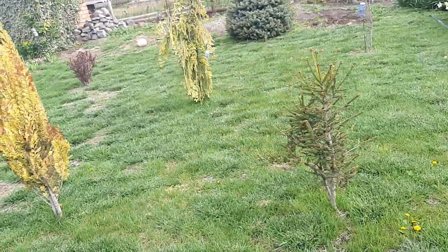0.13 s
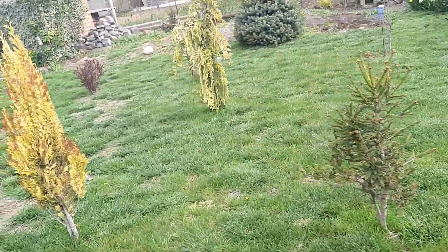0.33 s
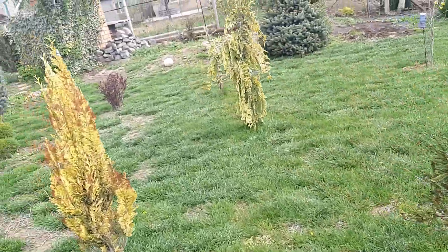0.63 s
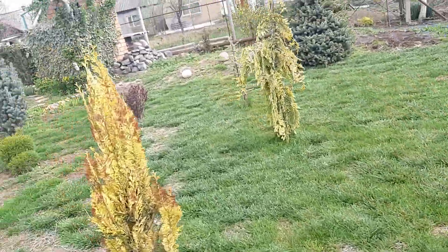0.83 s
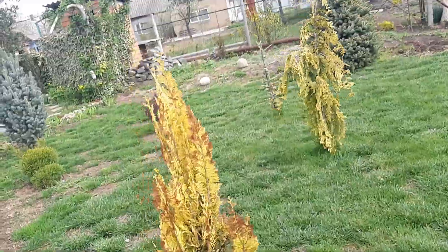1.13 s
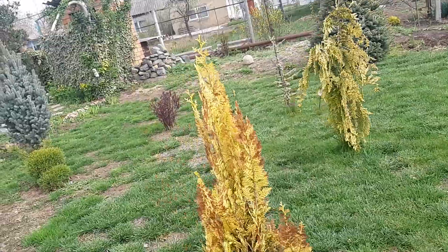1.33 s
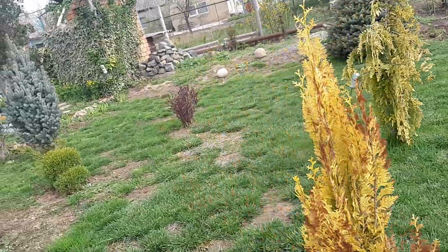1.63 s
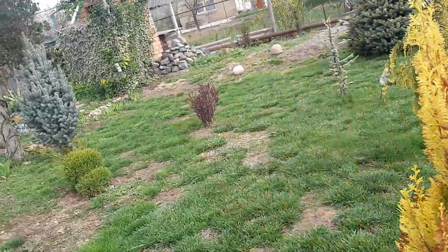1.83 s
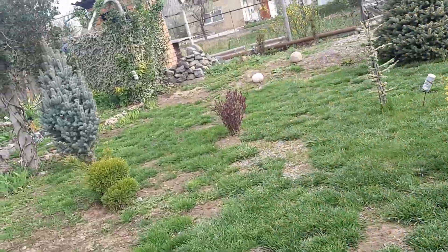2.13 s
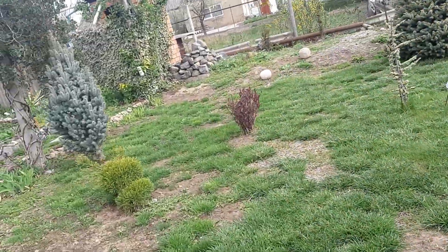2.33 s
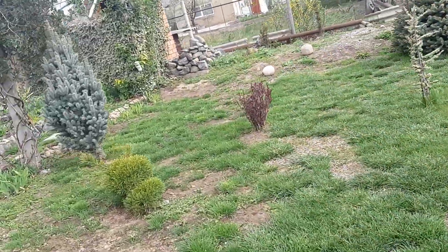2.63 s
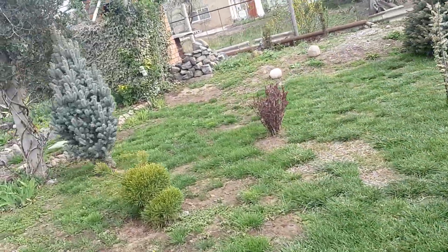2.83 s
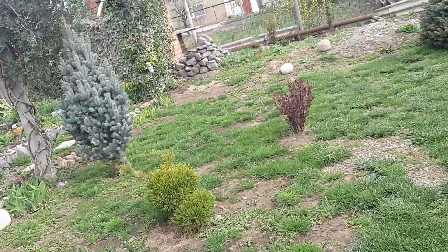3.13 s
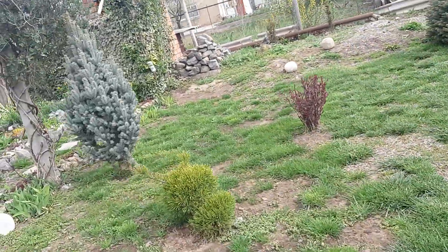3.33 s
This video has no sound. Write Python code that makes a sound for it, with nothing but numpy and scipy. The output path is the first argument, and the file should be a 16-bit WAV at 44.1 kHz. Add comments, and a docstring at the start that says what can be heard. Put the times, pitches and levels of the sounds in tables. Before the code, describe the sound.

Slow, soft footsteps cross a garden lawn, close by, at about 0.3, 0.9, 1.5, 2.1, 2.7 and 3.3 seconds. The strides mix a zipping trouser swish, hissing grass and a dull crunch, with a few tiny stalk snaps. From about 0.8 seconds, light gusts thump and rumble on the microphone, mostly on the right, strongest near 3.5 seconds. The garden behind is very quiet.

```python
"""Slow steps on a lawn

Someone walks six slow steps over a garden lawn, holding the microphone. In each stride the
trouser legs brush with a zipping swish, and the shoe sweeps the grass and presses the turf flat.
Light gusts buffet the microphone's openings, mostly the right one, over a very quiet garden."""
import sys
import numpy as np
from scipy import signal
from scipy.fft import rfft, irfft
from scipy.io import wavfile
from scipy.ndimage import uniform_filter1d

SR = 44100
rng = np.random.default_rng(int(sys.argv[2]) if len(sys.argv) > 2 else 0)


def put_to_file(sound):
    """Save the sound as 16-bit audio at rate SR, in the file named by the first command-line argument."""
    columns = np.atleast_2d(sound).T  # one column per channel
    safe = np.clip(columns, -1, 1)
    whole_steps = np.round(safe * 32767)
    wavfile.write(sys.argv[1], SR, whole_steps.astype(np.int16))


N = 154350
T = np.arange(N) / SR
HZ = np.maximum(np.fft.rfftfreq(N, 1 / SR), 1)


def from_db(db):
    """Turn decibels into a gain."""
    return 10 ** (np.asarray(db) / 20)


def unit_power(x):
    """Scale a signal to an average power of 1."""
    return x / np.sqrt(np.mean(x ** 2) + 1e-20)


def stereo(pan_db):
    """Left and right gains; pan_db is how much louder the left is."""
    gains = from_db(np.atleast_1d(pan_db) * np.array([[.5], [-.5]]))
    return gains / np.sqrt(np.mean(gains ** 2, axis=0))


def drift(rate_hz):
    """A smooth random wobble, about 1 in size."""
    return unit_power(irfft(rfft(rng.standard_normal(N)) / (1 + (HZ / rate_hz) ** 2), N))


def envelope(full_s, rise_s, hold_s, fade_s):
    """Swell to full level at full_s, hold, then die away."""
    return np.exp(-(np.minimum(T - full_s, 0) / rise_s) ** 2 - np.maximum(T - full_s - hold_s, 0) / fade_s)


def contacts(per_s, spread_db):
    """Tiny random clicks of unequal size."""
    clicks = (rng.random(N) < per_s / SR) * rng.choice([-1, 1], N)
    return unit_power(clicks * from_db(spread_db * np.minimum(rng.exponential(1, N), 4)))


def shape_tone(noises, tone, left_delay_s=.079e-3):
    """Shape three noises (shared, left, right) into stereo; likeness is the shared part, 0 to 1."""
    hz, *columns = np.transpose(tone)
    db, pan, likeness = [np.interp(np.log(HZ), np.log(hz), c) for c in columns]
    spectra = rfft(np.array(noises))
    pair = np.sqrt(likeness) * spectra[0] + np.sqrt(1 - likeness) * spectra[1:]
    pair *= from_db(db) * stereo(pan)
    pair[0] *= np.exp(-2j * np.pi * HZ * left_delay_s)
    return unit_power(irfft(pair, N))


def friction(strokes, tone, per_s, spread_db, flutter_db, flutter_hz):
    """Rubbing is many tiny contacts; it flutters as they catch and let go."""
    level = np.sqrt(sum((from_db(db) * envelope(s, *shape)) ** 2 for s, db, *shape in strokes))
    texture = shape_tone([contacts(per_s, spread_db) for _ in range(3)], tone)
    flutter = unit_power(from_db(flutter_db * drift(flutter_hz)))
    return level * texture * flutter


# Tone of the background: frequency_hz, gain_db, pan_db, likeness
GARDEN_TONE = [(19, -21, 0, 0.46), (41.7, -5.5, -7.5, 0.4), (88, 1, 1, 0.9), (130, -14, 0, 0.44),
               (270, -27, 0.5, 0.9), (447, -34, 0, 1), (970, -38.5, -0.5, 0.17), (2000, -38.5, -4.5, 0.067),
               (3530, -41, -3.5, 0.24), (4700, -42.5, 2.5, 0.035), (15500, -45, 0, 0.13)]

def garden():
    """The still garden: a steady low rumble with a faint hiss."""
    return from_db(-55.5) * shape_tone(rng.standard_normal((3, N)), GARDEN_TONE)


# Each rub: full_s, level_db, rise_s, hold_s, fade_s
CLOTH_RUBS = [(.02, -69, 0.029, 0.011, 0.012), (.178, -50, 0.01, 0.062, 0.038),
              (.33, -54.5, 0.12, 0.017, 0.053), (.63, -70, 0.027, 0.059, 0.024),
              (.79, -58.5, 0.039, .1, 0.14), (.93, -57.5, 0.06, 0.023, 0.028),
              (1.41, -58, 0.033, 0.1, 0.035), (1.57, -62, 0.029, 0.017, 0.06),
              (1.98, -62.5, 0.016, 0.052, 0.057), (2.14, -61.5, 0.057, 0.051, 0.037),
              (2.585, -60.5, 0.015, 0.095, 0.051), (2.75, -56.5, 0.012, 0.018, 0.022),
              (3.158, -57.5, 0.011, .055, 0.05), (3.33, -62.5, .04, 0.066, 0.036)]
# Its tone: frequency_hz, gain_db, pan_db, likeness
CLOTH_TONE = [(150, -30, -7, 0.78), (448, -15, 47, 0.23), (750, -12.5, -5, .8), (1020, -11, -6, 0.67),
              (1390, -1, -11, 0.27), (2020, 5, -14, 0.44), (2450, 1, -15, 1), (3370, 1.5, -15, 0.23),
              (3890, -6, -22, 0.34), (4980, -11, 29, 0.1), (15100, -34, 0, 0.066)]

def cloth_rub():
    """Cloth and shoe rub with a broad, scuffing noise."""
    return friction(CLOTH_RUBS, CLOTH_TONE, per_s=7000, spread_db=4.5, flutter_db=1.52, flutter_hz=44)


# The legs pass each other: start_s, length_s, level_db, fade_db, pitch_hz, rasp_over_whistle_db
LEG_PASSES = [(.162, 0.065, -41.5, 7, 4760, 2.5), (.743, 0.14, -51.5, 0.5, 4236, -9.5),
              (1.377, 0.12, -51, 4, 4644, 1), (2.591, 0.13, -51, 2.5, 4220, -5),
              (3.234, .125, -46.5, 7, 4333, -9)]

def trouser_swish():
    """Patches of ribbed cloth whistle, sinking as the leg slows; many smaller ones blur into a rasp."""
    end_hz, left_delay_s, left_own_share = 3444, .094e-3, .86
    out = np.zeros((2, N))
    for start, length, db, fade_db, hz, rasp_db in LEG_PASSES:
        age = np.maximum(T - start, 0)
        progress = np.minimum(age / length, 1)
        catch = 1 - .18 * np.exp(-age / .003)  # the pitch leaps up as the cloth catches
        glide = (hz + (end_hz - hz) * progress) * catch
        joined = np.clip(age / .02254 - 1, 0, 1)  # three patches swell in after the first
        whistle = np.zeros((2, N))
        for patch in range(4):
            wander = .12 * np.tanh(drift(31)) * (1 + joined) / 2
            pitch = glide * (1 + wander + .0297 * drift(857))
            phase = 2 * np.pi * np.cumsum(pitch) / SR
            patch_db = -1.5 - 9 * (1 - joined) if patch else 0
            gain = from_db(patch_db + .94 * drift(87))
            left_phase = phase - 2 * np.pi * pitch * left_delay_s + .63 * drift(38)
            whistle += gain * np.sin([left_phase, phase])
        whistle /= np.std(whistle[:, int(start * SR):])
        band = signal.butter(6, [2778, 1.057 * hz], "band", fs=SR, output="sos")
        right, own = signal.sosfilt(band, rng.standard_normal((2, N)))
        delayed = np.interp(T - left_delay_s, T, right)
        left = np.sqrt(1 - left_own_share) * delayed + np.sqrt(left_own_share) * own
        rasp = unit_power(np.array([left, right]) * from_db(2 * drift(180))) * np.minimum(age / .045, 1)
        swish = (whistle + from_db(rasp_db) * rasp) / np.hypot(1, from_db(rasp_db))
        out += swish * from_db(db - fade_db * progress) * envelope(start + .005, .005, length, .033)
    return out


# Each press of the sole: full_s, level_db, rise_s, hold_s, fade_s
TURF_PRESSES = [(.178, -56.5, .014, .05, 0.033), (.35, -55, 0.054, 0.029, 0.025),
                (.92, -53, 0.023, 0.051, 0.041), (1.225, -66, 0.013, 0.0082, 0.023),
                (1.39, -75, .015, 0.021, 0.03), (1.555, -64.5, 0.057, 0.067, 0.018),
                (2.148, -52.5, 0.023, 0.012, 0.028), (2.25, -69.5, 0.089, 0.021, 0.069),
                (2.58, -84, 0.0089, 0.0086, 0.015), (2.745, -56.5, 0.024, .02, 0.019),
                (3.126, -61.5, 0.015, 0.024, 0.081), (3.325, -57.5, 0.017, 0.034, 0.042)]
# Its tone: frequency_hz, gain_db, pan_db, likeness
TURF_TONE = [(200, -24, -31, 0.48), (425, -8.5, -10, .8), (600, -4, 2.5, 1), (774, 1.5, -4.5, 0.9),
             (946, -1, -3.5, 0.73), (1090, -5, -3, 0.52), (1570, -5, -12, 0.27), (2540, -16.5, -17, 0.61),
             (3970, -14.5, 1, 0.22), (5930, -23.5, 4, 0.3), (15000, -21.5, 0, 0.14)]

def turf_press():
    """The sole flattens the turf with a dull crunch."""
    return friction(TURF_PRESSES, TURF_TONE, per_s=3000, spread_db=0, flutter_db=1.55, flutter_hz=45)


# Each sweep through the grass: full_s, level_db, rise_s, hold_s, fade_s
GRASS_SWEEPS = [(.225, -53, 0.052, 0.055, 0.083), (.35, -58, 0.049, 0.042, 0.04),
                (.8, -61, 0.057, 0.12, 0.068), (.935, -53, 0.035, 0.026, 0.038),
                (1.03, -65, .05, 0.15, 0.062), (1.41, -65.5, 0.041, .07, .04),
                (1.52, -56.5, .025, 0.057, 0.09), (2.0, -69, 0.015, 0.074, 0.05),
                (2.145, -57.5, 0.046, 0.03, 0.059), (2.61, -62.5, 0.036, 0.1, .04),
                (2.755, -55.5, .02, 0.017, 0.035), (3.19, -58, 0.038, 0.059, 0.057),
                (3.36, -58.5, 0.038, .025, 0.066)]
# Its tone: frequency_hz, gain_db, pan_db, likeness
GRASS_TONE = [(350, -24, 2, .7), (900, -34, -10, 0.26), (3680, 7.5, -13.5, 0.28), (5100, -5, 4, .4),
              (7000, 1.5, 3, 0.31), (7220, -4, 1, 0.19), (9350, 4, -8, 0.87), (11030, -5.5, -0.5, 0.11),
              (14900, -5.5, 11, .1), (16600, 2.5, 8, .2)]

def grass_sweep():
    """Blades of grass slide over the shoe with a bright hiss."""
    return friction(GRASS_SWEEPS, GRASS_TONE, per_s=18000, spread_db=7.5, flutter_db=.4, flutter_hz=20)


# Small swirls of air, and last a loud sharp click just before the end: middle_s, peak_db, rate_hz, pan_db
AIR_SWIRLS = [(0.28, -35.5, 88, 26), (.822, -27.5, 89, -11), (0.869, -33, 269, -35), (.893, -23, 139, -36),
              (1.009, -24.5, 93, -37), (1.055, -30, 93, -34), (1.305, -32.5, 169, -32),
              (1.363, -29.5, 144, -33), (1.574, -25, 132, 20), (1.797, -26.5, 176, -30),
              (1.949, -22, 97, -36), (2.126, -24.5, 122, -31), (2.222, -23.5, 106, -36),
              (2.228, -20, 178, -42), (2.361, -30, 97, -30), (2.421, -32.5, 111, -25),
              (2.632, -29.5, 108, -18), (3.062, -19.5, 173, -32), (3.12, -20.5, 108, -31),
              (3.164, -20.5, 116, 14), (3.34, -23.5, 98, -5), (3.406, -15.5, 162, -36),
              (3.492, -8.5, 134, -50)]

def wind_thumps():
    """Each swirl thumps the microphone; a faster one is shorter and higher. The same shape gives the loud click
    at the very end."""
    width_cycles = .58
    out = np.zeros((2, N))
    for middle, db, hz, pan in AIR_SWIRLS:
        cycles = (T - middle) * hz
        swell = 1 / np.cosh(np.clip(2 * cycles / width_cycles, -20, 20))
        wave = np.sin(2 * np.pi * cycles * .88 + rng.uniform(0, 2 * np.pi))
        thump = np.gradient(swell * wave)
        out += from_db(db) * stereo(pan) / np.sqrt(2) * thump / abs(thump).max()
    return out


# Stalks breaking: start_s, peak_db, pitch_hz
STALK_SNAPS = [(0.3399, -37.5, 3160), (0.356, -44.5, 1300), (1.637, -44, 12200), (2.58, -48, 1830),
               (3.129, -47.5, 1000)]

def stalk_snaps():
    """A stalk snaps with a very short burst of noise around its own pitch."""
    fade_s = .00064
    out = np.zeros(N)
    for start, db, hz in STALK_SNAPS:
        band = signal.butter(2, [hz / 2, hz * 1.4], "band", fs=SR, output="sos")
        burst = rng.standard_normal(N) * (T >= start) * np.exp(-abs(T - start) / fade_s)
        snap = signal.sosfilt(band, burst + 1e-18)
        out += from_db(db) * snap / abs(snap).max()
    return out * stereo(pan_db=-3)


# Each swing of the leg: full_s, level_db, rise_s, hold_s, fade_s
LEG_SWINGS = [(.39, -60, 0.026, 0.081, 0.062), (1.06, -62, 0.057, 0.083, 0.034),
              (1.26, -68.5, 0.045, 0.034, 0.033), (1.98, -66.5, 0.059, 0.065, .05),
              (2.23, -68, 0.026, 0.012, 0.024)]
# Its tone: frequency_hz, gain_db, pan_db, likeness
SWING_TONE = [(300, -12, -1, 0.44), (574, -1.5, 1, 0.63), (900, -7.5, -9, 0.81), (1350, -7, -8, 0.32),
              (1860, 9, 0, .5), (2520, -1, -12, 0.44), (4050, 0.5, 7, 0.6), (4440, -14, 21, .2),
              (4830, 0, 14, .4), (6940, -3.5, 5, 0.11), (9600, -11, 0, 0.1), (15300, -17, 14, .1)]

def leg_rustle():
    """The leg swings on with a softer, hollow rustle."""
    return friction(LEG_SWINGS, SWING_TONE, per_s=9000, spread_db=2.5, flutter_db=.8, flutter_hz=90)


# Puffs of wind: full_s, level_db, rise_s, hold_s, fade_s, upper_edge_hz, pan_db
WIND_GUSTS = [(0.829, -44, 0.026, 0.17, 0.047, 135, -18), (0.861, -40.5, 0.004, 0.056, 0.0067, 269, -22),
              (1.294, -43.5, 0.016, 0.035, 0.094, 161, -31), (1.745, -44.5, 0.033, 0.019, 0.047, 168, -22),
              (1.79, -36.5, 0.016, 0.063, 0.048, 213, -37), (1.926, -37.5, 0.015, 0.024, 0.019, 168, -29),
              (2.031, -38.5, 0.017, 0.23, 0.02, 157, -24), (2.215, -46, 0.0095, 0.026, 0.015, 333, -23),
              (2.466, -48, 0.068, 0.095, 0.016, 120, -11), (2.585, -42, 0.0083, 0.022, 0.037, 134, -30),
              (2.726, -45.5, 0.0059, 0.018, 0.013, 112, -3), (2.903, -45, 0.0052, 0.14, 0.0081, 157, -23),
              (3.053, -32.5, 0.0091, 0.01, 0.018, 233, -48), (3.116, -35, 0.013, 0.025, 0.1, 151, -1),
              (3.33, -36.5, 0.0098, 0.092, 0.017, 171, -9), (3.4, -37.5, 0.0066, 0.11, .03, 302, -33)]

def wind_gusts():
    """Churning air rumbles separately at each opening of the microphone."""
    low_hz, top_hz, steadiness = 63, 660, .57
    limits = (1 + (low_hz / HZ) ** 6) * (1 + (HZ / top_hz) ** 10)
    out = np.zeros((2, N))
    for full, db, rise, hold, fade, edge_hz, pan in WIND_GUSTS:
        band = 1 / np.sqrt(limits * (1 + (HZ / edge_hz) ** 8.16))
        air = irfft(rfft(rng.standard_normal((2, N))) * band, N)
        power = abs(uniform_filter1d(air ** 2, size=1100)) + 1e-18
        air = unit_power(air / power ** (steadiness / 2))  # partly even out the loudness
        out += from_db(db) * stereo(pan) * air * envelope(full, rise, hold, fade)
    return out


def scene():
    """Add up the garden, the clothes, the steps and the wind."""
    return (garden() + cloth_rub() + trouser_swish() + turf_press() + grass_sweep()
            + wind_thumps() + stalk_snaps() + leg_rustle() + wind_gusts())


def record(dry):
    """Cut the highest treble off steeply."""
    cutoff_hz = 15900
    return signal.sosfilt(signal.ellip(12, .1, 80, cutoff_hz, fs=SR, output="sos"), dry)


dry = scene()
out = record(dry)
put_to_file(out)
```